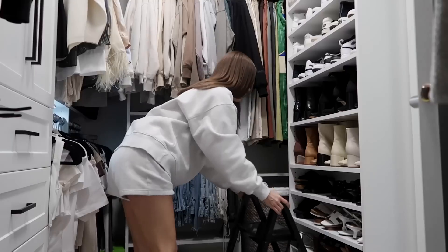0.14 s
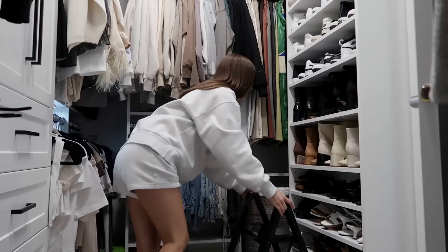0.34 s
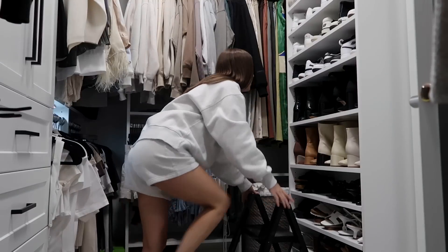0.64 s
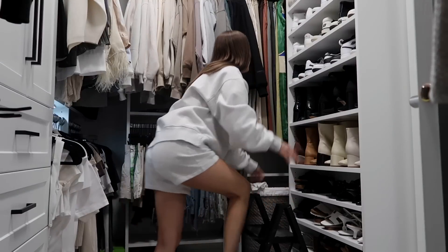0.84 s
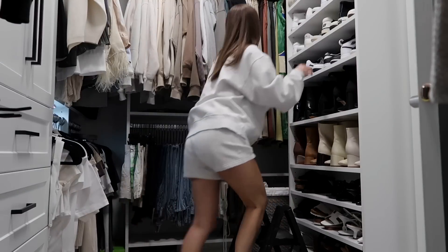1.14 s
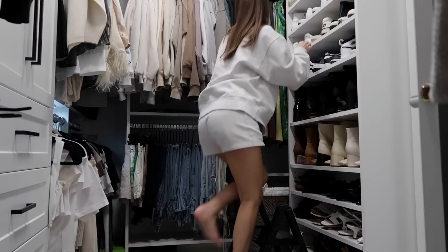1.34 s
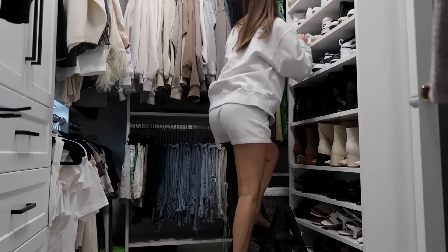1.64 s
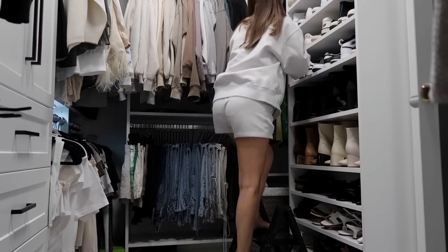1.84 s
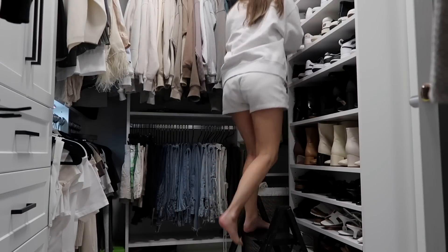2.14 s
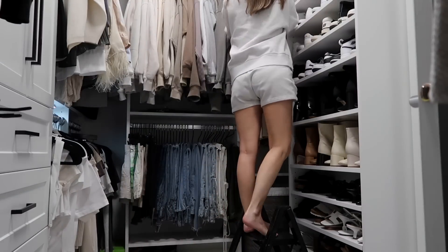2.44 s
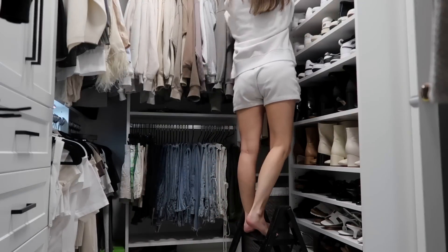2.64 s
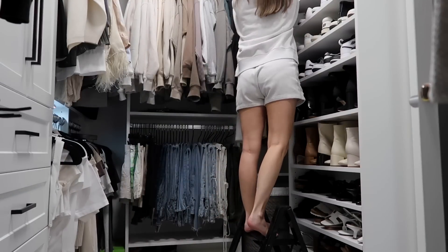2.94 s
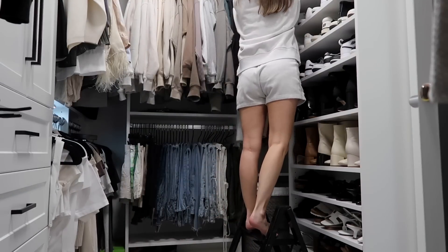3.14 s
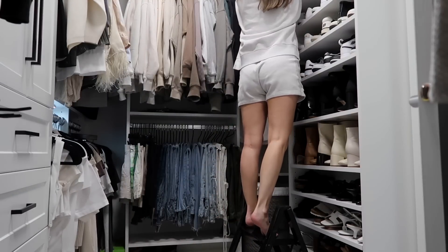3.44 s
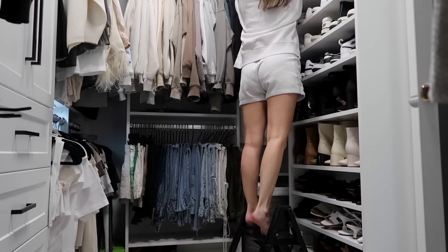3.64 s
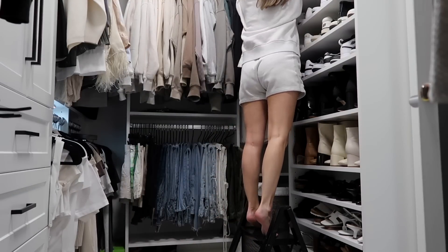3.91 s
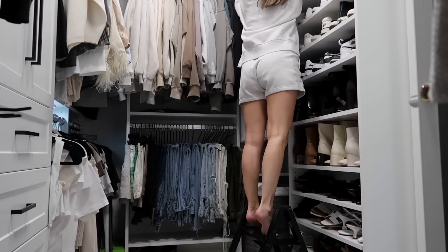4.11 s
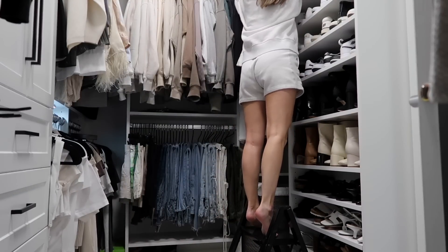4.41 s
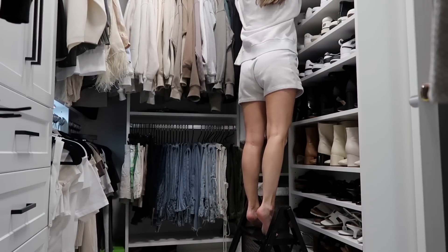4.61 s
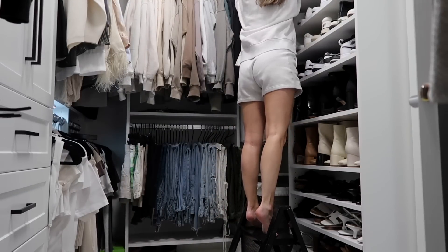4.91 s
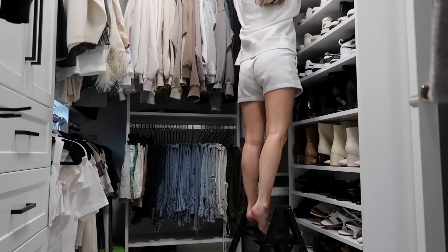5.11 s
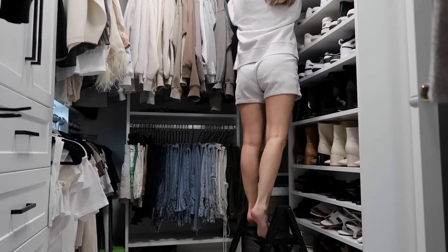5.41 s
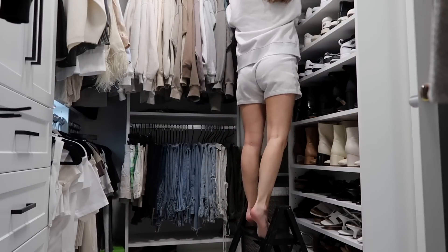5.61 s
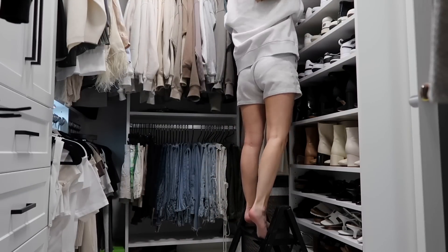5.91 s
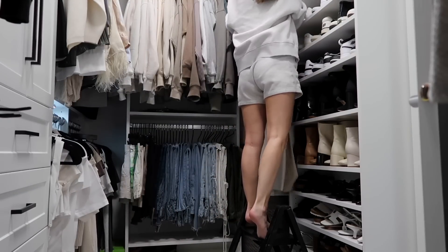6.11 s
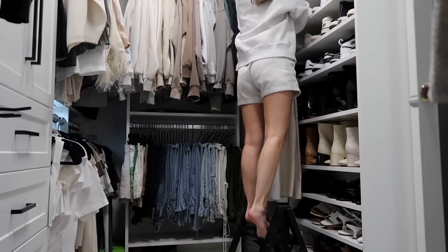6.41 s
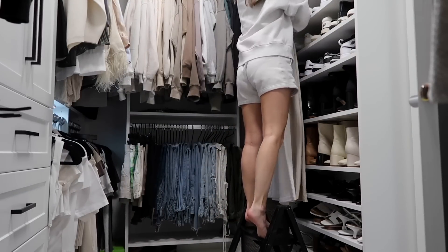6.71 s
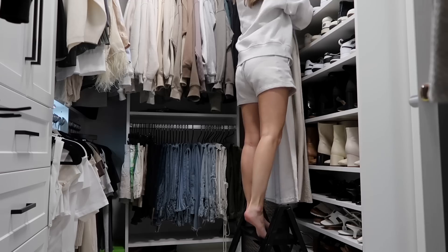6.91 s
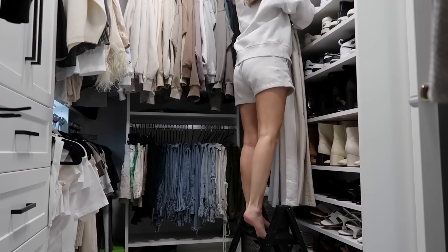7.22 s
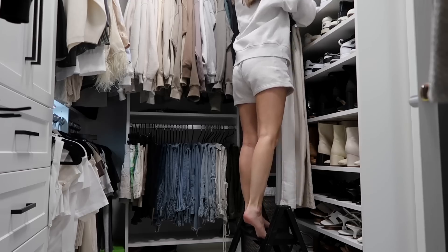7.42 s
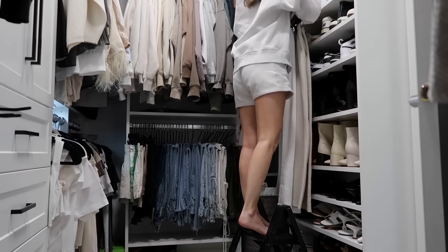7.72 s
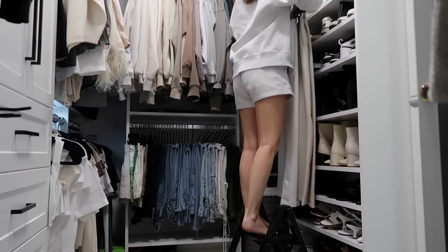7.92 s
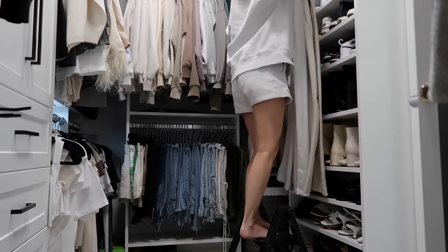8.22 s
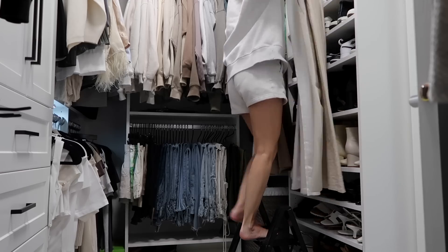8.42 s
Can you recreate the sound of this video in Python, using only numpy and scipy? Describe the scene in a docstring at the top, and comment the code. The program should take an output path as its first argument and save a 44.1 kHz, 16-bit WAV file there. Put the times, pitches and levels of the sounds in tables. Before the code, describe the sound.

In a small closet, a step stool knocks and rattles under footsteps before clothes hangers click, clack and slide along a rod.

```python
"""A folding metal step stool clatters down, rattles and is climbed, thudding the floor of a walk-in closet. A
few low wooden knocks, as on a shelf, fall among the stool's clatter. Hangers click, knock and slide on the rod
above. Each contact is a blow and a brief noisy rattle that rings the stool's tubes or a hook; slides are
catching friction noise, thuds are low decaying notes. Feet and cloth rub the stool. The room is small and
damped by clothes; a low hum and hiss lie under it."""
import sys
import numpy as np
from scipy import signal
from scipy.fft import rfft, irfft, next_fast_len
from scipy.io import wavfile
from scipy.ndimage import uniform_filter1d, map_coordinates

SR = 44100
rng = np.random.default_rng(int(sys.argv[2]) if len(sys.argv) > 2 else 0)


def transcribe(u):
    """Save the signal u as a 16-bit wav file named by the first command-line argument.

    u: samples, shape (n,) or (channels, n), limited to [-1, 1]; the rate is SR.
    q: integer samples, one column per channel.
    """
    v = np.clip(np.atleast_2d(u).T, -1, 1)
    q = np.round(v * 32767).astype(np.int16)
    wavfile.write(sys.argv[1], SR, q)


N = 377055
HIT_SAMPLES = 16384  # one contact with its room tail

# The modes of hook and rod. Each row: frequency in Hz, width in Hz, level in dB.
HOOK_MODES = [(744, 58, 9), (1464, 170, 3), (2170, 42, 5.5), (2500, 99, 9), (3630, 275, 4.5),
              (4120, 51, 13), (5057, 260, 7.5), (5625, 132, 11), (6240, 720, -4.5), (7330, 230, 5.5),
              (7800, 660, -8), (9940, 690, 3)]


def stool_and_shelf():
    """Blows ring the stool's metal tubes and treads and shake its loose joints; a few low wooden knocks, as on
    a shelf, sound through the same modes."""
    # Each row: start in seconds, clack peak in dB, then weight, edge and hollow knock in dB against
    # the clack, rattle t60 in seconds, favoured mode in Hz.
    contacts = [(.1095, -17, -6.5, -19, -5, 0.087, 2620), (.1232, -20, -34, -12, -14, 0.075, 2470),
                (.1374, -23, -15, -18, -14, 0.21, 2210), (.2223, -15.5, -29, -14.5, -11, 0.041, 3150),
                (.2374, -21, -34, -11, -9.5, 0.06, 1896), (.448, -16.5, -35, -22, -10.5, 0.077, 1750),
                (.4654, -24.5, -25, -23, -10, 0.049, 1660), (.599, -28, -25, -13.5, -7, 0.12, 3700),
                (.8183, -50, -14, -28, -6, 0.06, 1650), (1.0025, -30.5, -5, -16, -14, 0.064, 3100),
                (1.069, -29.5, -10.5, -32, -1.5, 0.084, 2340), (1.1004, -37, -33, -14, -26, .08, 2360),
                (1.1468, -39.5, -28, -12, -30, 0.18, 1760), (1.1967, -32.5, -4.5, -35, -2.5, 0.068, 1820),
                (1.682, -35, -15, -25, -14.5, 0.12, 2220), (1.6982, -40, -22, -13, -30, .17, 2760),
                (1.8488, -32.5, -31, -23, -17.5, 0.076, 2190), (1.8996, -40, -28, -10, -9, 0.03, 2180),
                (1.9678, -39.5, -8, -19, -10, 0.19, 1720), (2.0179, -42.5, -6, -12, -15, .068, 3440),
                (2.5311, -47, -20, -14, -7, 0.07, 1790), (3.3563, -37, -0.5, -8, -0.5, 0.036, 4150),
                (4.4383, -47, -5, -11, -1, 0.044, 1440), (5.0568, -34, -7, -3.5, -2, 0.034, 3700),
                (5.1731, -28, -2, -12.5, -2, 0.036, 1590), (5.3068, -43, -23, -41, -4.5, 0.07, 2280),
                (7.502, -36, 2, -8.5, 3, 0.083, 2520), (7.9583, -34, -17, -34, -5.5, 0.046, 2290),
                (8.3729, -42.5, -31, -21, -15, .13, 2210), (8.4021, -32.5, -31, -19, -19, .2, 1580),
                (8.4282, -26, -13, -24, -4, 0.029, 3430), (8.4424, -30.5, -29, -17, -17, 0.026, 2170)]
    # Tubes and treads. Each row: frequency in Hz, width in Hz, level in dB.
    frame_modes = [(274.4, 13.3, -2.5), (584, 17.6, 4.5), (684, 153, -3), (896.4, 53, 7.5),
                   (1280, 290, -16), (1660, 183, 3), (1770, 117, 4), (1956, 180, 4), (2210, 330, -1.5),
                   (2490, 84, 4.5), (2792, 144, 1), (3303, 154, 6.5), (3700, 260, 3.5), (4150, 310, 7.5),
                   (4710, 420, -0.5), (5970, 1130, 1.5)]
    # How each register, clack to air, answers a blow. Each row: offset in dB, shares of weight, edge, knock.
    voicing = [(0, 0.0064, 0.0026, 0), (0.5, 1, 0.012, 0.024), (0, 0.017, 0, 1), (-5.5, 0.031, 0.23, 0.052),
               (0, 0.057, 0.95, 0.016), (-19.5, 0, 0.75, 0)]
    return knocks(contacts, frame_modes, voicing, rise_s=0.002)


def hanger_clicks():
    """Wire hooks strike the rod: a dry tick and a bright metal ring."""
    # Each row: start in seconds, clack peak in dB, then weight, edge and dry tick in dB against
    # the clack, rattle t60 in seconds, favoured mode in Hz.
    contacts = [(2.7554, -49.5, -4, 3.5, -19, 0.025, 5270), (2.848, -46, 0, 8, -9, 0.043, 3630),
                (2.9124, -41.5, -12, -16, -12, 0.11, 2030), (2.9396, -34, -18, -10, -20.5, 0.046, 2170),
                (2.9866, -45, 7, 7, -4, 0.15, 5400), (3.041, -29.5, -18, 7, -6.5, 0.073, 3700),
                (3.1448, -38, -2.5, -15, -35, .027, 2150), (3.1867, -54, 11, 7, -18, 0.028, 5520),
                (3.2928, -55, 1, -7, -21, 0.062, 1410), (3.3777, -50, -7, 4, -18, .029, 4230),
                (3.5233, -40, -20, -4, -17, 0.059, 2060), (3.6127, -59.5, -4, 1, -17, .04, 3610),
                (4.0579, -39.5, -19, -7.5, -11.5, 0.03, 1930), (4.095, -60, -10, 4, -10, .025, 5500),
                (4.1177, -44.5, -23, 1.5, -7.5, .032, 3700), (4.26, -63, -16, 1.5, -10, 0.032, 5200),
                (4.7295, -40.5, -19, 2.5, -3, 0.033, 2160), (4.7628, -30, -22, 6, -8.5, 0.024, 5880),
                (4.9873, -46.5, -6, -28, -40, .082, 1700), (5.4282, -49, -10, 6, -18.5, 0.021, 4700),
                (5.9893, -43.5, -32, -6.5, -19, .043, 2180), (6.0502, -34.5, -38, -1.5, -8, 0.053, 4000),
                (6.0699, -29.5, -24, 1.5, -2, 0.074, 2170), (6.0879, -26.5, -32, -5, -7, 0.018, 2200),
                (6.1355, -23.5, -29, -7.5, -30, 0.059, 2670), (6.1482, -28, -36, -30, -33, 0.062, 2640),
                (6.5207, -45, -12, -5.5, -21, .044, 2260), (6.5906, -48.5, -15, -0.5, -23, 0.07, 2400),
                (6.6897, -45.5, -11, -1, -13, 0.024, 3760), (6.7313, -48.5, -5, 1.5, -20.5, 0.039, 5200),
                (6.8981, -41.5, -36, -1, -23, .025, 3700), (6.919, -27, -38, 2.5, -6.5, 0.026, 2500),
                (6.9796, -33, -30, 14.5, -1.5, 0.022, 5260), (7.0409, -36, -33, -10, -32, 0.1, 3700),
                (7.049, -31, -29, 4, -13, .04, 2430), (7.1407, -44, -14, -5, -17, 0.041, 4400),
                (7.1607, -38, -10, 0, -17, 0.02, 2470), (7.239, -36.5, -25, -4.5, -19, 0.025, 2460),
                (7.2821, -44, -3, -11, -21, .029, 1480)]
    # The registers, clack to air. Each row: offset in dB, shares of weight, edge, tick.
    voicing = [(0, 0.0039, 0, 0.0077), (0, 0.97, 0.13, 0.086), (-4.5, .6, 0, 0.016), (-6, 0.084, 0.15, 0),
               (0.5, 0.013, 1, 0.0083), (0, 0, 0.015, 1)]
    return knocks(contacts, HOOK_MODES, voicing, rise_s=0.0022)


def knocks(contacts, modes, voicing, rise_s, bare_db=-6.0, right_db=0.5):
    """Each contact is a blow and a short uneven rattle, heard both bare and through the object's modes."""
    # Register centres in Hz: clack, body, knock, clink, edge, air, then the range's bottom and top.
    register_hz = [2000, 240, 800, 3800, 5500, 9500, 90, 15000]
    # The scoop between an object's body and its ring. Each row: frequency in Hz, gain in dB.
    scoop = [(300, -5.5), (450, -12), (550, -4)]
    t, hz = np.arange(HIT_SAMPLES) / SR, np.fft.rfftfreq(HIT_SAMPLES, 1 / SR)
    order, log_centres = np.argsort(register_hz), np.log(np.sort(register_hz))
    bands = [np.interp(np.log(hz + 1), log_centres, order == k) * amp(along(scoop, hz)) for k in range(6)]
    mode_hz = np.array(modes)[:, 0]
    out, lead = np.zeros((2, N + HIT_SAMPLES)), 64  # lead: samples kept ahead of the attack
    for start, peak_db, *touch_db, rattle_t60, favoured_hz in contacts:
        chatter_db = 2.7 * np.repeat(rng.standard_normal(HIT_SAMPLES // 64), 64)  # loose joints
        rattle = amp(chatter_db - 60 * t / rattle_t60)
        blow = 0.67 * amp(-60 * t / 0.0034)
        force = rng.standard_normal(HIT_SAMPLES) * (blow + rattle) * (1 - np.exp(-t / rise_s))
        # The place of the blow favours one mode; near the clink register it lifts that too.
        mode_db = 9 * np.exp(-(np.log(mode_hz / favoured_hz) / 0.079) ** 2)
        mode_db += 2.95 * rng.standard_normal(len(modes))
        register_db = np.array(voicing) @ [1, *touch_db]
        register_db[3] += 10.5 * np.exp(-(np.log2(favoured_hz / register_hz[3]) / 0.33) ** 2)
        spectrum = rfft(force) * (amp(bare_db) + resonances(modes, hz, mode_db)) * closet()
        hit = 0
        for band, db in zip(bands, register_db):
            part = irfft(spectrum * band)
            crest = np.sqrt(2 * uniform_filter1d(part[0] ** 2, size=256).max())
            hit += amp(peak_db + db) * part / crest
        out[:, round(start * SR) - lead:][:, :HIT_SAMPLES] += np.roll(hit, lead, axis=1)
    return out[:, :N] * amp([[-right_db / 2], [right_db / 2]])


def rod_rings(t60=0.19):
    """The struck rod sings on in thin, wavering notes."""
    # Each row: start in seconds, level in dB, pitch in Hz.
    rings = [(3.36, -45, 4210), (3.359, -41.5, 2720), (6.052, -41, 4120), (6.138, -39, 4120),
             (7.167, -49, 2560), (7.54, -45, 5100)]
    return tones([(*row, t60) for row in rings], rise_s=0.0021, waver_rad=1.6)


def floor_thuds(set_down_s=0.112, step_t60=0.27):
    """The floor gives under each step and rings at one low note; setting the stool down rings three."""
    # Weight shifting on the floor. Each row: start in seconds, level in dB, pitch in Hz.
    steps = [(1.198, -28.5, 85.5), (1.703, -25, 75.5), (1.999, -37.5, 85.5), (2.541, -34, 79),
             (3.12, -34, 86), (3.31, -37.5, 181), (3.976, -42, 53), (4.452, -42.5, 57.5), (4.769, -45, 179),
             (5.054, -41.5, 75), (5.186, -35.5, 105.5), (5.19, -38.5, 302), (7.51, -40, 95.5),
             (7.967, -39, 81.5), (8.437, -28.5, 78)]
    set_down = [(set_down_s, -25, 53, 0.6), (set_down_s, -21.5, 136, 0.16), (set_down_s, -27, 198, 0.236)]
    return tones(set_down + [(*row, step_t60) for row in steps], rise_s=0.0058, waver_rad=0)


def hanger_slides(flare_db=4):
    """Hooks dragged on the rod catch and slip, each mode flaring at its own moments."""
    # Each row: start in seconds, length in seconds, level in dB.
    drags = [(2.86, 0.26, -41.5), (5.03, 0.074, -54.5), (6.045, .11, -49), (6.88, 0.39, -56),
             (7.56, 0.043, -57)]
    # The colour of the scrape. Each row: frequency in Hz, level in dB.
    colour = [(120, -37), (200, -9), (310, -1), (500, -13.5), (1000, -8), (2000, -10), (3500, -8.5),
              (6000, -17), (10000, -31), (15000, -43)]
    catches = amp(4 * wobble(350) + 2.5 * wobble(45))
    scrape = stereo_noise(colour, likeness=[(1000, 1.0), (9000, 0.81)]) * catches
    flares = sum(filtered(scrape * amp(flare_db * wobble(40)), lambda hz: resonances([mode], hz))
                 for mode in HOOK_MODES)
    return strokes(drags, rise_db_per_s=700, fall_db_per_s=232) * unit(2 * scrape + flares)


def shuffles():
    """Feet and cloth rub the stool in short, softly grained swishes."""
    # Each row: start in seconds, length in seconds, level in dB.
    rubs = [(.26, 0.14, -56.5), (.62, 0.051, -47), (1.91, 0.093, -47), (2.165, .01, -59), (7.68, .01, -45),
            (8.325, 0.032, -58), (8.415, .01, -51)]
    # The colour of the rub. Each row: frequency in Hz, level in dB.
    colour = [(150, -40), (400, -4), (900, -6), (1500, -3), (2600, 3), (4500, -10.5), (8000, -21.5),
              (13000, -48)]
    friction = stereo_noise(colour, likeness=[(1000, 0.93)])
    grain = amp(3 * wobble(200) + 2 * wobble(30))
    return strokes(rubs, rise_db_per_s=235, fall_db_per_s=262) * unit(friction * grain)


def closet(wet_db=-6.5, left_lag_s=19e-6):
    """Stereo frequency response of the closet: direct sound from slightly right, then a short, damped tail."""
    # The treble dies first. Each row: frequency in Hz, t60 in seconds.
    decay = [(150, 0.44), (1000, 0.18), (4000, 0.13), (12000, 0.12)]
    # The tail is narrow in the bass, wide on top. Each row: frequency in Hz, side against middle in dB.
    width = [(100, -22.5), (300, -24), (1000, -33), (4000, -17), (10000, 3)]
    hz, t, noise = signal.stft(rng.standard_normal((2, HIT_SAMPLES // 2)), SR, nperseg=128)
    noise[1] *= amp(along(width, hz))[:, None]
    fade = amp(-60 * t / along(decay, hz)[:, None])
    mid, side = signal.istft(noise * fade, SR, nperseg=128)[1][:, :HIT_SAMPLES // 2]
    impulse = amp(wet_db) * np.array([mid + side, mid - side]) / np.linalg.norm(mid)
    impulse[:, 0] += 1  # the direct sound
    phase = np.pi * left_lag_s * np.fft.rfftfreq(HIT_SAMPLES, 1 / SR)
    return rfft(impulse, HIT_SAMPLES) * np.exp(1j * np.array([-phase, phase]))


def floor_rumble():
    """The house hums unsteadily: noise through the low resonances of the joists."""
    # The rumble's swells. Each row: time in seconds, level in dB.
    swells = [(0.0, -60), (0.28, -52), (0.71, -71), (1.26, -52), (1.52, -64), (1.88, -53), (2.16, -63),
              (2.43, -70), (3.1, -46.5), (3.69, -62), (4.88, -60), (5.28, -52), (5.57, -72), (6.9, -63),
              (7.38, -55.5), (7.79, -62.5), (8.55, -56)]
    # Each row: frequency in Hz, width in Hz, level in dB.
    joist_modes = [(53, 9.2, 2.5), (87.5, 59, -5)]
    gain = amp(np.interp(np.arange(N) / SR, *np.transpose(swells)))
    return gain * unit(filtered(rng.standard_normal(N), lambda hz: resonances(joist_modes, hz)))


def room_hiss(level_db=-52):
    """Room and microphone make a nearly steady bed of noise."""
    # Each row: frequency in Hz, relative level in dB.
    colour = [(12, -43.5), (20, -7), (93, -4.5), (116, -13.5), (270, -9), (356, -11), (468, -12),
              (599, -15.5), (1560, -18.5), (1700, -20), (2560, -22), (3370, -24.5), (3860, -25),
              (11600, -37.5), (14000, -48)]
    # The stereo image. Each row: frequency in Hz, left-right likeness from -1 to 1.
    likeness = [(60, 1), (130, 0.85), (290, -0.28), (640, -0.14), (1410, -0.16), (3100, -0.031),
                (6820, -0.082), (15000, -0.59)]
    return amp(level_db + 0.53 * wobble(9.5)) * stereo_noise(colour, likeness)


def resonances(modes, hz, extra_db=None):
    """Response of an object's modes, alternating in sign; extra_db changes the strength of each."""
    extra_db = np.zeros(len(modes)) if extra_db is None else extra_db
    return sum((-1) ** k * amp(db + extra_db[k]) * 1j * hz * width / (centre**2 - hz**2 + 1j * hz * width)
               for k, (centre, width, db) in enumerate(modes))


def tones(notes, rise_s, waver_rad):
    """Soft-edged decaying sines. Each note: start in seconds, level in dB, pitch in Hz, t60 in seconds."""
    out, t = np.zeros(N + SR), np.arange(SR // 2) / SR
    drift = np.pad(waver_rad * wobble(120), (0, SR))
    for start, db, hz, t60 in notes:
        onset = round(start * SR)
        span = slice(onset, onset + len(t))
        envelope = amp(db - 60 * t / t60) * (1 - np.exp(-t / rise_s))
        out[span] += envelope * np.sin(2 * np.pi * hz * t + drift[span])
    return out[:N]


def strokes(events, rise_db_per_s, fall_db_per_s):
    """Gain per sample: each stroke swells up to its start, holds for its length and fades."""
    t, gain = np.arange(N) / SR, 0
    for start, length, db in events:
        before, after = np.maximum(start - t, 0), np.maximum(t - start - length, 0)
        gain += amp(db - rise_db_per_s * before - fall_db_per_s * after)
    return gain


def stereo_noise(colour, likeness):
    """Coloured noise of rms 1; likeness sets how far left and right agree at each frequency."""
    def mid_and_side(hz):
        angle = np.arccos(np.clip(along(likeness, hz), -1, 1)) / 2
        return amp(along(colour, hz)) * [np.cos(angle), np.sin(angle)]
    mid, side = filtered(rng.standard_normal((2, N)), mid_and_side)
    return unit(np.array([mid + side, mid - side]))


def filtered(x, response):
    """x through a complex response, given as a function of Hz."""
    size = next_fast_len(N + SR // 2)
    return irfft(rfft(x, size) * response(np.fft.rfftfreq(size, 1 / SR)), size)[..., :N]


def wobble(rate):
    """A smooth random curve, rate knots a second."""
    return map_coordinates(rng.standard_normal(int(N * rate / SR) + 4), [np.arange(N) * rate / SR])


def along(points, hz):
    """Interpolate (Hz, value) points on a log frequency axis."""
    knots, values = np.transpose(points)
    return np.interp(np.log(hz + 1), np.log(knots + 1), values)


def amp(db):
    return 10 ** (np.asarray(db) / 20)


def unit(x):
    return x / np.sqrt(np.mean(x ** 2) + 1e-20)


def scene():
    """Stool and hangers in front, thuds and rubbing around them, room tone underneath."""
    impacts = stool_and_shelf() + hanger_clicks() + rod_rings() + floor_thuds()
    return impacts + hanger_slides() + shuffles() + floor_rumble() + room_hiss()


def record(dry, top_hz=15700):
    """The camera keeps nothing above its band limit."""
    return filtered(dry, lambda hz: hz < top_hz)


dry = scene()
out = record(dry)
transcribe(out)
```